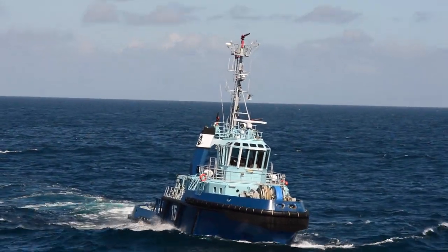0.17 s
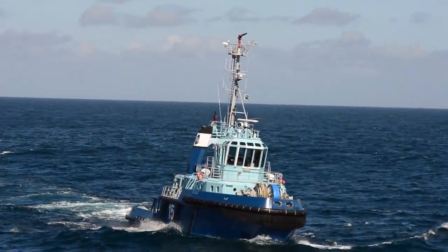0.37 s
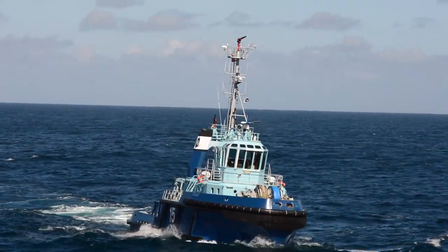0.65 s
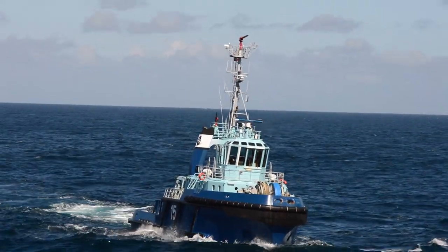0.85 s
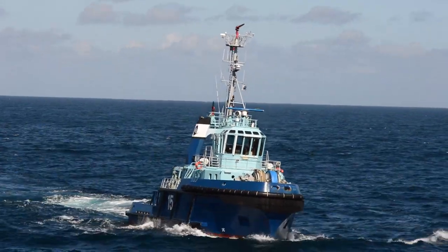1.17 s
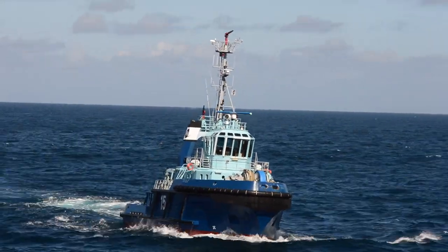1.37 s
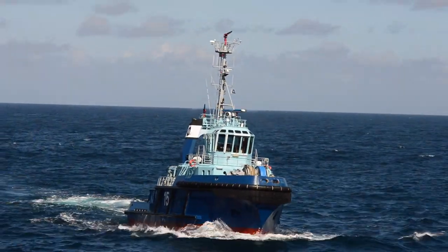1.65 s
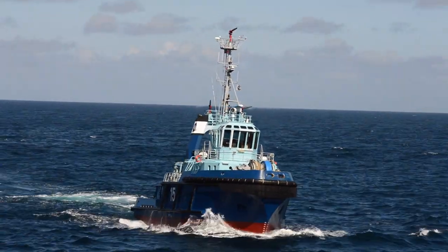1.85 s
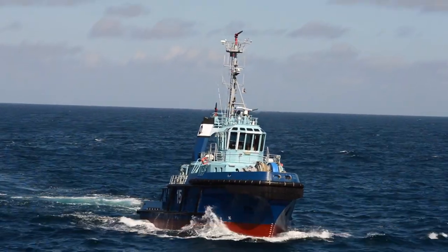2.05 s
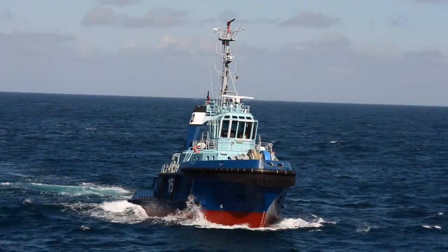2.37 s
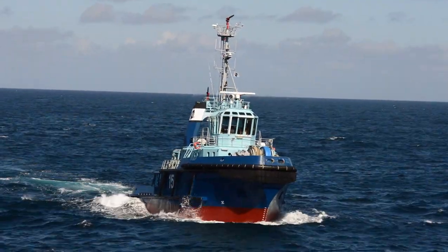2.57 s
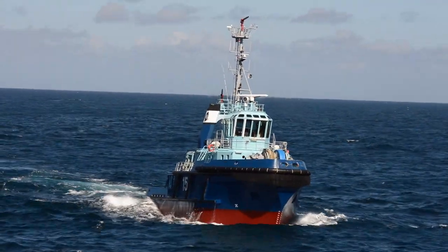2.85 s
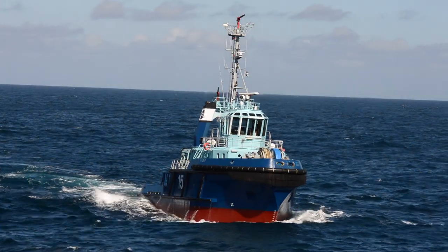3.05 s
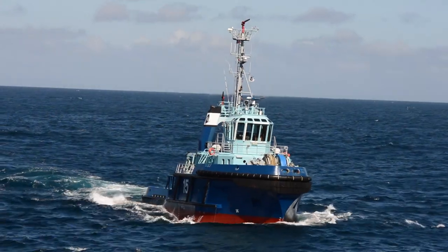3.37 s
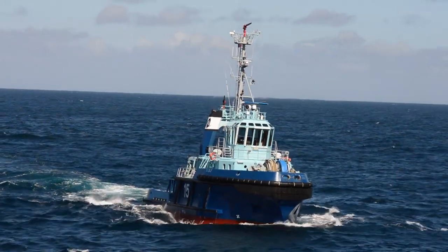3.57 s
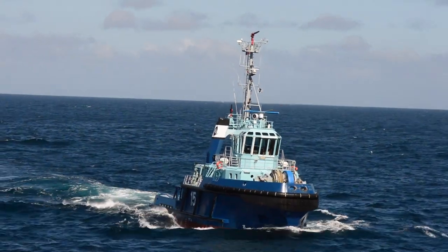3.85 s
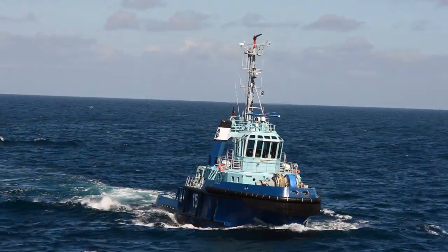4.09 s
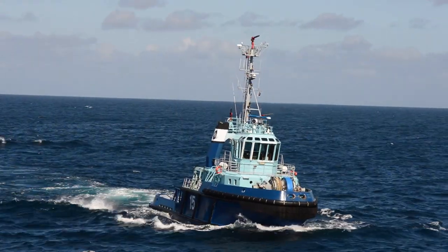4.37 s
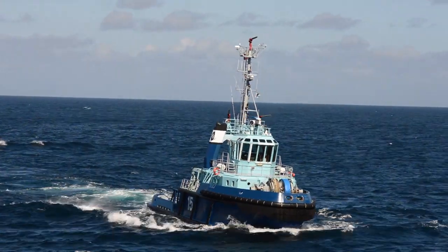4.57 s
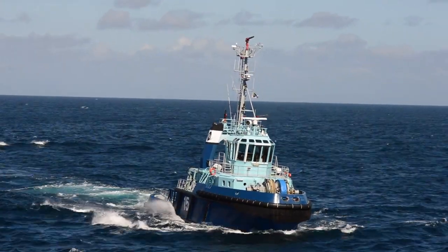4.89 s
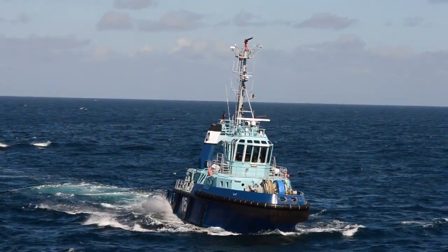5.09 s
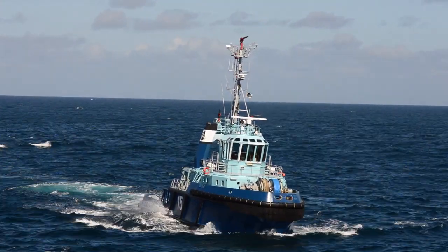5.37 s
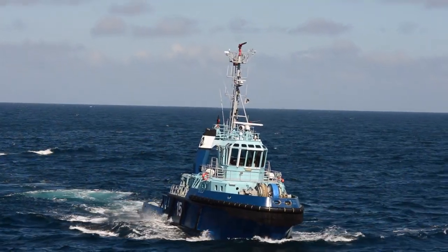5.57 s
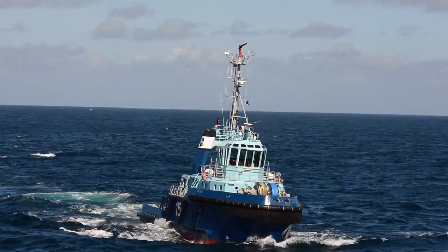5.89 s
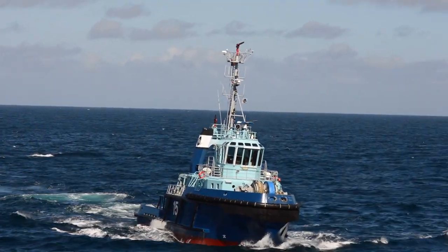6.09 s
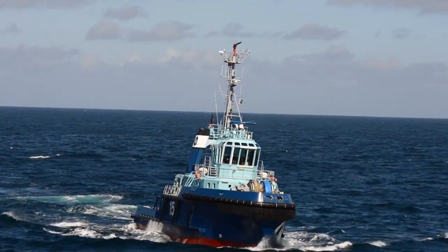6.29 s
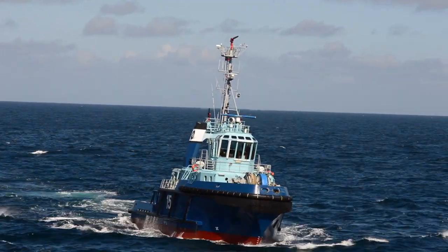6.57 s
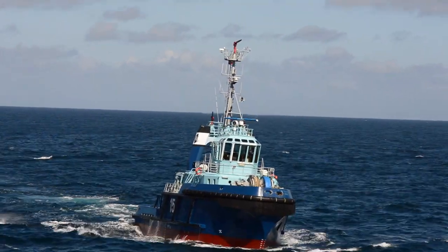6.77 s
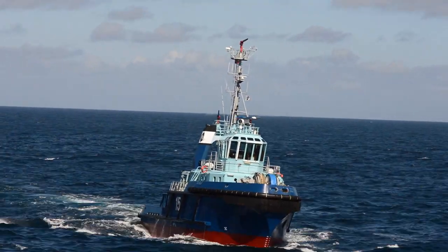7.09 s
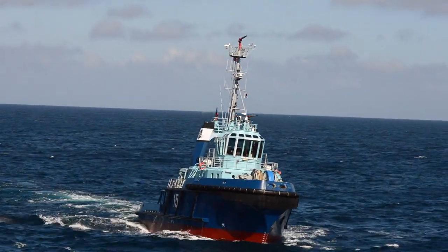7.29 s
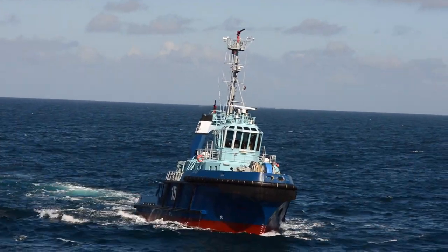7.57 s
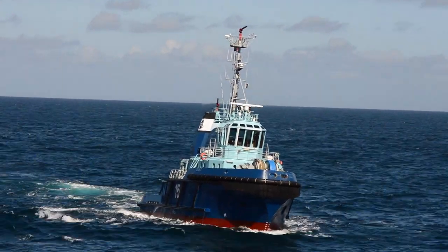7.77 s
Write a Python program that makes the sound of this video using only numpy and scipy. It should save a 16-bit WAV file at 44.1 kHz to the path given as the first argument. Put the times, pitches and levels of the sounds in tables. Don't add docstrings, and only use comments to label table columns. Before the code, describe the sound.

Heavy marine diesels drone low and steady, throbbing about five times a second, with roaring exhaust and bright sea wash hissing along the hull.

```python
import sys
import numpy as np
from scipy import signal
from scipy.fft import rfft, irfft
from scipy.io import wavfile
from scipy.ndimage import uniform_filter1d, minimum_filter1d, map_coordinates

SR = 44100
rng = np.random.default_rng(int(sys.argv[2]) if len(sys.argv) > 2 else 0)


def to_linear_factor(level_db):
    exponent = np.asarray(level_db, float) / 20
    return 10 ** exponent


def store_wav(level_fs):
    pcm = np.round(np.clip(np.atleast_2d(level_fs), -1, 1) * 32767)
    wavfile.write(sys.argv[1], SR, pcm.T.astype(np.int16))


N = 350154
CYCLE_HZ = 5.0
SLOW = 16


def unit(x):
    return x / np.sqrt(np.mean(np.abs(x) ** 2) + 1e-20)


def along(points, hz):
    f, v = np.transpose(points)
    return np.interp(np.log(hz + 1), np.log(f + 1), v)


def curves(rows, t):
    s, *cols = np.transpose(rows)
    return [np.interp(t, s, c) for c in cols]


def wobble(rate, t):
    return map_coordinates(rng.standard_normal(400), [t * rate], mode="wrap")


def rush(spectrum, patchy_db):
    z = signal.stft(rng.standard_normal(N + SR), nperseg=512)[2]
    field = uniform_filter1d(rng.standard_normal(z.shape), size=6, axis=0)
    field = uniform_filter1d(field, size=12, axis=1)
    x = signal.istft(z * to_linear_factor(patchy_db * unit(field)), nperseg=512)[1][:N + SR]
    response = to_linear_factor(along(spectrum, np.fft.rfftfreq(len(x), 1 / SR)))
    return unit(irfft(rfft(x) * response, len(x))[:N])


# time in seconds, crank lead in ms, second engine's lead over the first in ms.
GOVERNOR_LEAD = [(0, 1.2, -3), (.5, 1.4, -1.5), (1, 1.2, -.4), (1.5, 1.1, .1), (2.2, .6, -.2),
                 (3, .1, -2.5), (3.6, -.1, -2.9), (4.2, .1, -2.8), (4.6, .1, -1.5), (5, -.5, .4),
                 (5.7, -2.3, 4.1), (6.2, -3.4, 4.4), (6.6, -3.6, 3.3), (7, -3.1, 1.8), (7.5, -1.4, 0),
                 (8, -.1, -1.8)]


def crank(t):
    return CYCLE_HZ * (t + curves(GOVERNOR_LEAD, t)[0] / 1000)


# time in seconds, exposure in dB.
HULL_ROLL = [(0, 0), (.45, 1), (1.5, 0), (2.4, -0.3), (3.0, 1.1), (4.1, 1.3), (4.7, 0.6), (5.1, 0),
             (5.8, 0.1), (6.5, 0.9), (7.2, -0.2), (7.94, 1)]
# time in seconds, height in dB.
WAVE_SLAPS = [(.15, 2), (2.75, 2), (3.14, 2.5), (3.78, 0), (4.05, 1), (4.45, 0), (4.7, 1.5), (5.93, 1.5),
              (6.37, 1.5), (6.57, 1.5), (6.8, 1)]


def seaway(t):
    half_length_s = 0.023
    slaps = sum(db * np.exp(-((t - s) / half_length_s) ** 2 / 2) for s, db in WAVE_SLAPS)
    return curves(HULL_ROLL, t)[0] + slaps


def puffs(t):
    lean_factor = 1.4
    depth_db, place_in_cycle, unevenness = 3.0, .85, .35
    surge = np.cos(2 * np.pi * (crank(t) - place_in_cycle))
    return lean_factor * seaway(t) + depth_db * (1 + unevenness * wobble(1.356, t)) * surge


# frequency in Hz, delay in ms.
BAND_DELAY = [(37.5, 163), (42.5, 97), (47.5, 16), (67, 135), (92.5, 11), (97.5, 54), (102.5, 15),
              (112.5, 116), (122.5, 94), (132.5, 174), (167.5, 131), (177.5, 187), (197, 185), (205, 240)]


def order_phases(hz):
    delay_s = along(BAND_DELAY, hz + CYCLE_HZ / 2) / 1000
    phase = -2 * np.pi * np.cumsum(CYCLE_HZ * delay_s)
    blur = np.clip(hz / 100 - 2.1, 0, 3)
    return np.r_[0, phase[:-1]] + blur * rng.standard_normal(len(hz))


# cycle order, level in dB rms.
STRONG_ORDERS = [(7, -32.5), (8, -21.2), (9, -27.4), (10, -37.9), (14, -33.4), (15, -44.7), (18, -24.9),
                 (19, -24.5), (20, -33.9), (21, -40.2), (23, -43.8), (24, -27.0), (25, -29.9), (26, -30.2),
                 (27, -28.1), (28, -42.9), (29, -37.6), (30, -39.1), (31, -42.2), (32, -39.2), (33, -25.3),
                 (34, -35.9), (35, -29.0), (36, -35.2), (37, -35.9), (39, -38.9), (40, -35.5), (41, -27.1),
                 (42, -38.9), (44, -43.7),
                 (48, -55.7), (49, -45.6), (50, -37.8), (51, -44.7), (52, -52.3), (53, -50.1), (54, -44.7),
                (59, -51.3), (64, -53.3), (69, -55.3), (72, -55.2), (76, -51.8), (77, -46.0), (78, -51.8),
                (79, -53.0), (82, -53.5), (92, -54.9), (94, -54.6), (95, -51.4), (107, -48.8), (114, -54.2),
                (125, -51.7), (128, -54.4), (131, -55.8), (132, -51.7), (133, -53.7), (140, -54.8),
                (142, -55.7)]
# frequency in Hz, level in dB rms.
WEAK_ORDERS = [(15, -77), (60, -82), (215, -83), (240, -84), (330, -57), (460, -62), (510, -58), (600, -62),
               (740, -64), (815, -59), (865, -62.5), (920, -67.5), (955, -59), (1000, -77)]


def first_engine(t, order, phase):
    hz = order * CYCLE_HZ
    level_db = along(WEAK_ORDERS, hz) + 3 * rng.standard_normal(len(order))
    for k, db in STRONG_ORDERS:
        level_db[round(k) - order[0]] = db
    plating_db = 0.6 * puffs(t)
    x, turn = np.zeros(len(t)), 2 * np.pi * crank(t)
    for k, f, db, p in zip(order, hz, level_db, phase):
        depth = min(.04 + .0006 * f, .22)
        waver = 1 + depth * (wobble(2.5, t) + 1j * wobble(2.5, t))
        load_db = 0.7 if f < 62 else 1.1 if f < 290 else plating_db + 3.0
        x += to_linear_factor(db + load_db) * np.sqrt(2) * np.real(waver * np.exp(1j * (k * turn + p)))
    return x


# cycle
# order, level in dB rms, lead in ms at which it falls in step with the first engine's phase.
TWIN_ORDERS = [(7, -42.5, -5.9), (8, -37, 9.2), (9, -36.5, 3.5), (13, -47, 2), (14, -47, -2.7),
               (16, -43, 5.5), (20, -33.4, 3), (21, -35.4, .9), (23, -41.3, .8), (24, -32.8, -1.6),
               (30, -36, -1.5), (31, -35, -1.1), (32, -35.4, 2.1), (33, -31.5, 1.45), (34, -40.5, -.3)]


def second_engine(t, order, phase):
    ahead_ms = curves(GOVERNOR_LEAD, t)[1]
    x = np.zeros(len(t))
    for k, db, step_ms in TWIN_ORDERS:
        turn = 2 * np.pi * (crank(t) + CYCLE_HZ * (ahead_ms - step_ms) / 1000)
        x += to_linear_factor(db) * np.sqrt(2) * np.cos(k * turn + phase[round(k) - order[0]])
    return x


# frequency in Hz, level in dB rms.
PUMP_TONES = [
    (54, -49),
    (269.9, -40.5),
    (272.7, -46),
]


def pump(t):
    x = np.zeros(len(t))
    for f, db in PUMP_TONES:
        x += to_linear_factor(db) * np.sqrt(2) * np.sin(2 * np.pi * f * t + 1.9 * wobble(1.93, t))
    return x


def engines():
    t = np.arange(N // SLOW + 2) * SLOW / SR
    order = np.arange(4, 204)
    phase = order_phases(order * CYCLE_HZ)
    x = first_engine(t, order, phase) + second_engine(t, order, phase) + pump(t)
    return signal.resample_poly(x, SLOW, 1)[:N]


# frequency in Hz, spectrum level in dB per Hz.
RUMBLE_SPECTRUM = [(12, -40), (27, -17), (45, -15), (70, -16), (100, -8), (114, -9), (135, -5), (162, 0),
                   (197, -10), (221, -6), (250, -19), (272, -9), (295, -17), (500, -120)]
# frequency in Hz, spectrum level in dB per Hz.
ROAR_SPECTRUM = [(150, -6.5), (260, 0), (323, -8), (384, -10), (428, -9), (470, -6.5), (503, -18),
                 (645, -3), (748, -15), (839, -17.5), (973, -21.5), (1030, -25), (1300, -20.5), (1690, -54),
                 (2860, -120)]


def gas():
    t = np.arange(N) / SR
    flutter_db = 1.3 * np.cos(12 * 2 * np.pi * crank(t))
    puff_db = puffs(t) + flutter_db + 0.9 * wobble(12, t)
    roar = to_linear_factor(-32) * unit(to_linear_factor(puff_db) * rush(ROAR_SPECTRUM, patchy_db=0.5))
    rumble = to_linear_factor(-26.5 + 2.1 * wobble(3.07, t)) * rush(RUMBLE_SPECTRUM, patchy_db=1.6)
    return roar + rumble


# frequency in Hz, spectrum level in dB per Hz.
WASH_SPECTRUM = [(500, -42), (900, -1.5), (1100, -2.5), (2000, -6.5), (3000, -10.5), (4200, -16),
                 (5700, -21), (6600, -20.5), (9800, -22), (11000, -27.5), (12500, -38), (14000, -42),
                 (15700, -50), (16500, -120)]


def sea():
    t = np.arange(N) / SR
    flicker_db = 0.083 * wobble(30, t) + .3 * wobble(6, t)
    wash = unit(to_linear_factor(flicker_db) * rush(WASH_SPECTRUM, patchy_db=-0.22))
    return to_linear_factor(-36.5 + seaway(t)) * wash


# time in seconds, depth in dB.
GAIN_DIPS = [(1.37, 5.5), (3.18, 5), (3.6, 6.5), (4.25, 5), (5.8, 5.5), (6.96, 5.5), (7.36, 4)]


def ducking():
    t = np.arange(N) / SR
    attack_s, release_s = 0.018, 0.043
    dip_db = np.zeros(N)
    for s, db in GAIN_DIPS:
        after = np.maximum(t - s, 0)
        dip_db += db * (1 - np.exp(-after / attack_s)) * np.exp(-after / release_s)
    return to_linear_factor(-dip_db)


def scene():
    return (engines() + gas() + sea())[None]


def band_limit(x):
    return signal.sosfilt(signal.butter(12, 15720, fs=SR, output="sos"), x)


def record(dry):
    top, crest = 0.58, .54
    dry = dry * ducking()
    need = np.minimum(1, top / (np.abs(dry) + 1e-9))
    gain = uniform_filter1d(minimum_filter1d(need, size=1500), size=1400)
    held = dry * gain
    rounded = held / (1 + np.abs(held / crest) ** 6) ** (1 / 6)
    return band_limit(rounded)


dry = scene()
out = record(dry)
store_wav(out)
```